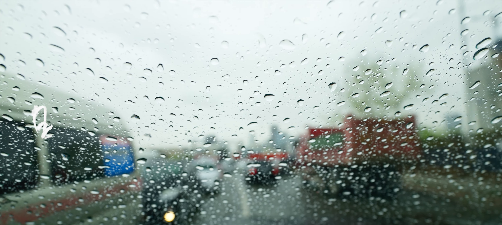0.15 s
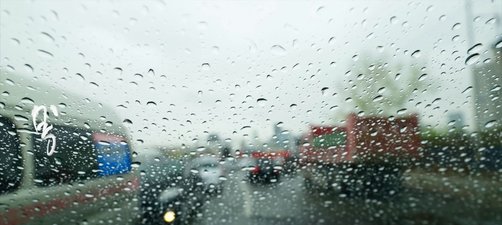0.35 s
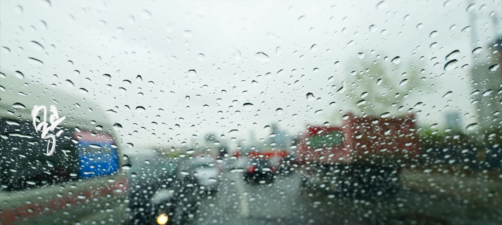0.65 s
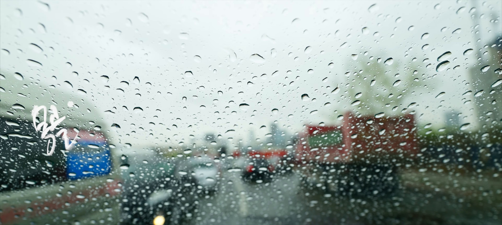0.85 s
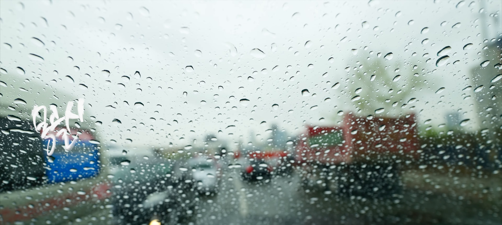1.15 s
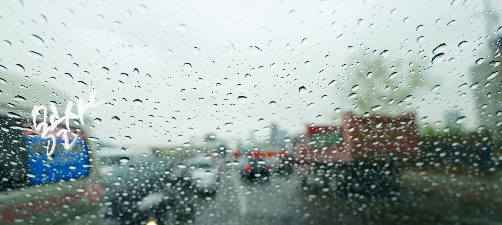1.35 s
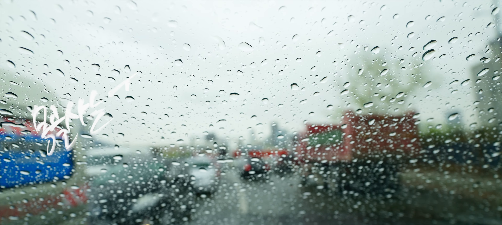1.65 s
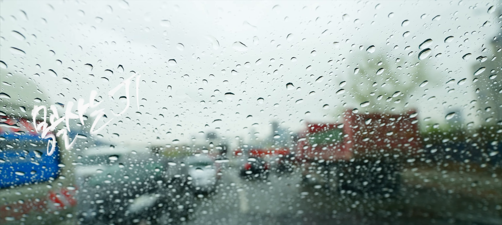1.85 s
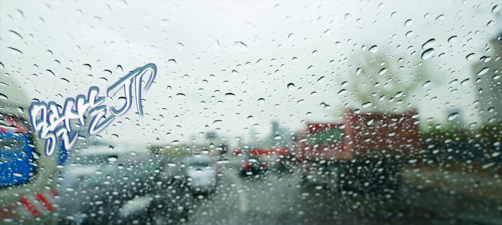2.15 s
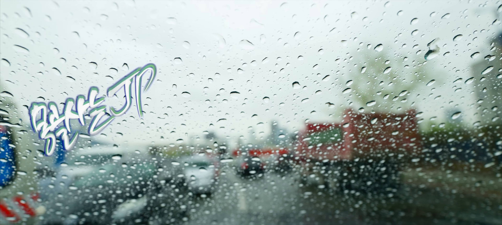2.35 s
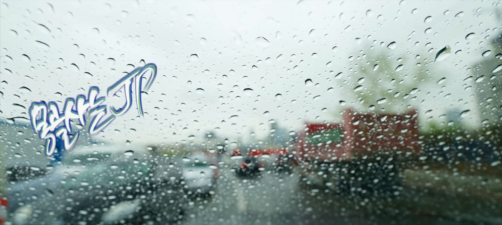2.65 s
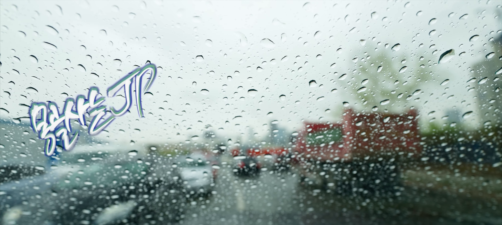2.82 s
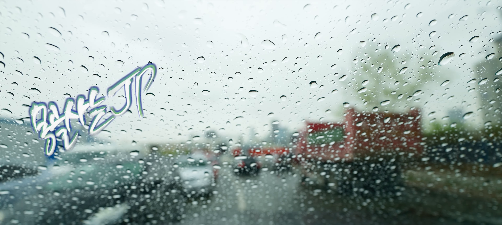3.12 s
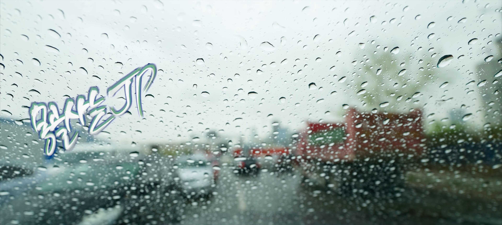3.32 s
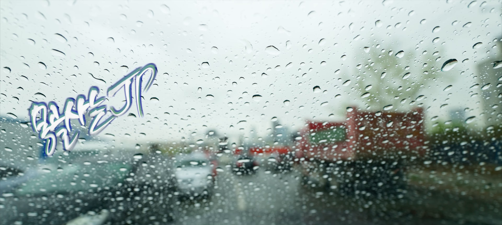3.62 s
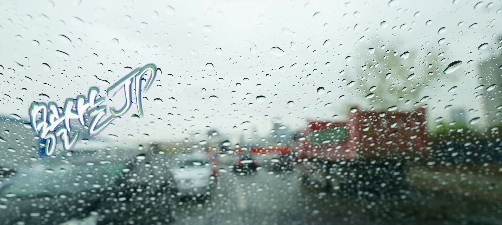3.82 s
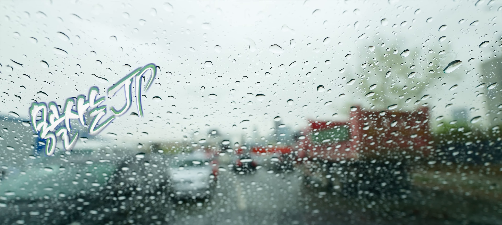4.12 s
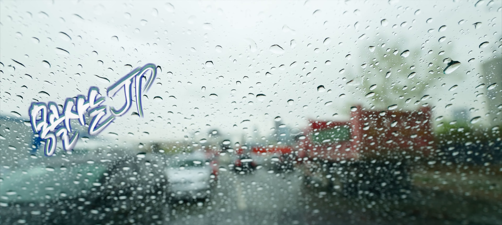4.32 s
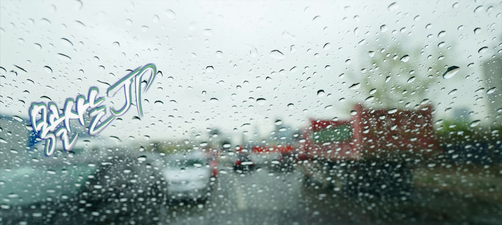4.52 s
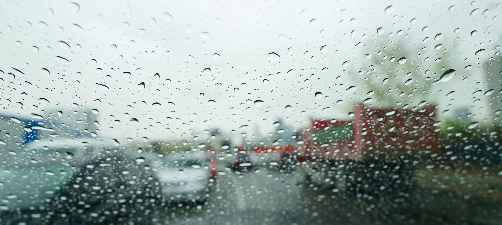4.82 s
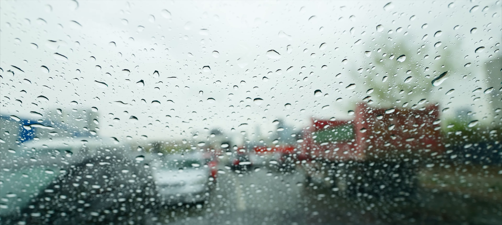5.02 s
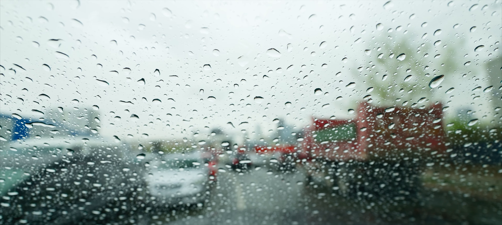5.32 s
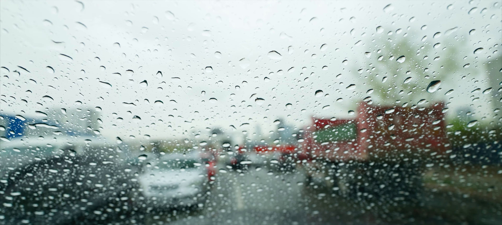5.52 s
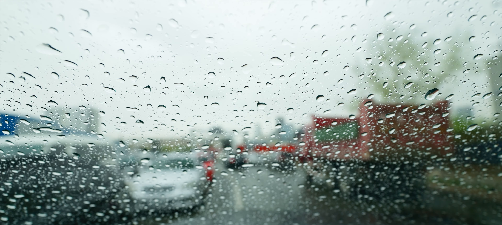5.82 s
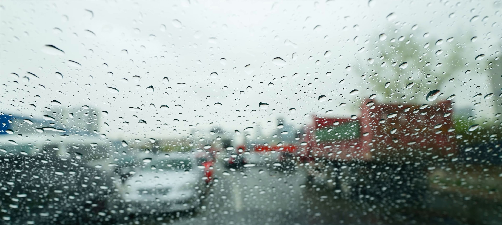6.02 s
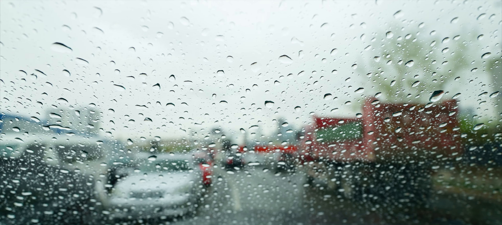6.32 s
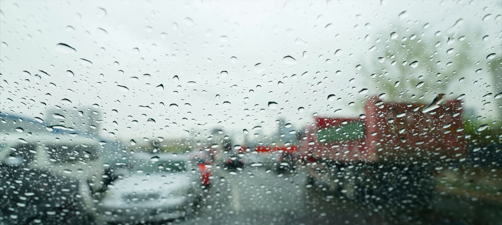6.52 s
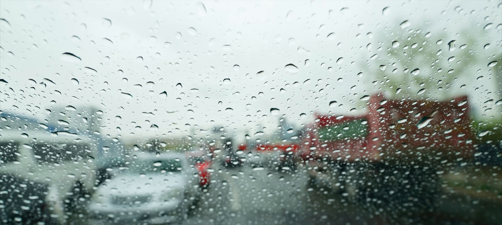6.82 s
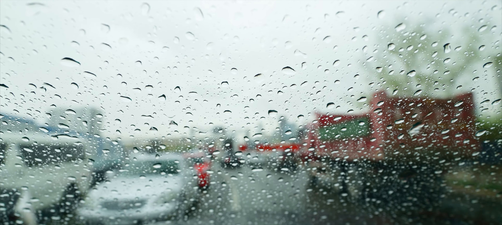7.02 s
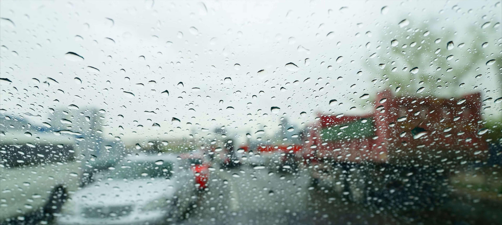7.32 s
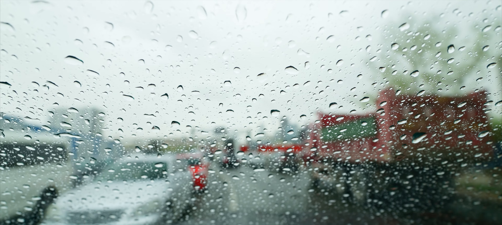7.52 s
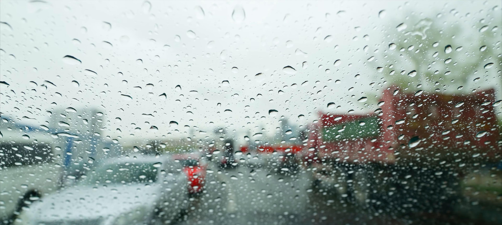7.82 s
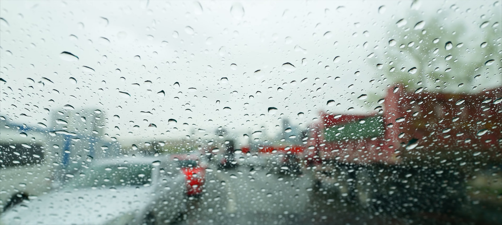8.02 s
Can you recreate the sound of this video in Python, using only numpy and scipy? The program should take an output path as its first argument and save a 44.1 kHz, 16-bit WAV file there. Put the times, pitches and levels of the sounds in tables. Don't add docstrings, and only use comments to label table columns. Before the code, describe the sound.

Inside a car in slow traffic, raindrops patter and snap ever harder as one deep engine climbs, then a louder one accelerates with clatter.

```python
import sys
import numpy as np
from scipy import signal
from scipy.fft import rfft, irfft, next_fast_len
from scipy.io import wavfile
from scipy.ndimage import uniform_filter1d

SR = 44100
rng = np.random.default_rng(int(sys.argv[2]) if len(sys.argv) > 2 else 0)


def bounce(signal):
    frames = np.transpose(np.atleast_2d(signal))
    limited = np.clip(frames, -1, 1)
    pcm = np.round(limited * 32767).astype(np.int16)
    wavfile.write(sys.argv[1], SR, pcm)


def ratio_of_db(decibels):
    return 10 ** (np.asarray(decibels, float) / 20)


N = 359876

# (time [s], level [dB])
SHOWER = [(0.0, -44.5), (0.45, -45), (0.7, -43.5), (1.32, -43.5), (1.93, -42), (2.93, -40.5), (3.29, -38),
          (3.43, -39.5), (3.64, -37), (4.02, -40), (4.73, -39.5), (5.25, -39.5), (5.66, -37), (5.79, -38.5),
          (6.07, -38), (6.2, -37.5), (7.48, -35.5), (8.16, -41)]
# (time [s], peak [dB])
BIG_DROPS = [(0.5238, -25), (0.9847, -25), (1.5207, -23), (3.058, -20), (3.3328, -18), (3.3792, -21),
             (3.4835, -18.5), (3.5737, -35), (3.684, -24), (3.8521, -19), (4.1843, -26), (4.5818, -28),
             (4.7521, -29), (4.8897, -17.5), (4.9935, -19), (5.061, -28), (5.1297, -18.5), (5.3028, -27),
             (5.58, -25), (5.696, -20.5), (5.773, -16.5), (5.9616, -20.5), (6.0741, -17.5), (6.1444, -28),
             (6.203, -23), (6.2645, -18), (6.5001, -16.5), (6.6429, -29), (7.5178, -20), (7.879, -20.5)]
# (frequency [Hz], level per Hz [dB])
PANEL_COLOUR = [(250, 0), (420, -1.5), (600, -5.5), (1000, -5.5), (1700, -7.5), (2250, -13), (3100, -12.5),
                (3600, -16), (5600, -23.5), (6600, -31), (7800, -44), (9100, -41), (10200, -45),
                (15500, -58)]
# (frequency [Hz], 60 dB decay [s])
PANEL_DECAY = [(300, 0.075), (1500, 0.12), (4000, 0.03), (8000, 0.03), (15000, .012)]
# (frequency [Hz], width [Hz], level [dB])
CABIN_MODES = [(467, 68, -16), (1000, 72, -21), (1433, 100, -16), (2630, 1300, -16), (7120, 170, -9.5),
               (8640, 570, -19)]
# (time [s], peak [dB])
GLASS_TICKS = [(0.4294, -48), (2.366, -45), (3.0574, -41), (3.1906, -51), (3.2056, -40.5), (3.5259, -41.5),
               (3.7988, -44), (4.3814, -46), (4.9227, -47), (5.0095, -48), (5.3028, -52), (5.5099, -39.5),
               (5.6156, -47), (5.696, -42), (5.9589, -40.5), (6.1729, -49), (6.2108, -39.5), (6.3345, -41),
               (6.6588, -50), (6.7436, -48), (6.9641, -48), (7.0414, -44), (7.0993, -47), (7.3572, -47.5),
               (7.5168, -46), (7.5393, -39), (7.5642, -41), (7.8406, -45), (7.8635, -46), (8.1419, -47)]
# (time [s], peak [dB])
SIDE_WINDOW_TAPS = [(1.2271, -30), (1.52, -29.5), (2.4808, -28), (2.557, -30), (2.6559, -27), (3.0924, -25),
                    (3.3328, -30), (3.484, -34), (3.5733, -40), (3.7633, -28.5), (3.8511, -23), (4.0996, -34),
                    (4.682, -26), (5.0614, -27), (5.1637, -34), (5.231, -33), (5.3028, -26), (5.773, -31),
                    (5.8506, -22.5), (6.0726, -33), (6.121, -21), (6.4003, -29), (6.965, -26.5), (7.0898, -25),
                    (7.4854, -29), (7.5178, -28), (7.5392, -27.5), (8.0511, -32.5), (8.086, -39), (8.112, -27.5)]
# (time [s], firing rate [Hz])
FIRST_SPEED = [
    (0, 38.91),
    (0.951, 39.73),
    (1.299, 48.54),
    (2.2, 54),
    (2.651, 58.7),
    (3.089, 62.43),
    (3.9, 67.17),
    (4.4, 70.4),
    (4.6, 65.36),
]
# (time [s], effort [dB])
FIRST_THROTTLE = [
    (0.2, -9),
    (0.9, -18),
    (1.1, 0.5),
    (1.6, -10.5),
    (2.3, -2.5),
    (2.65, 0.5),
    (3.55, -0.5),
    (3.7, -4.5),
    (4.45, 0),
]
# (multiple of firing rate, level [dB], share of effort followed)
FIRST_ORDERS = [(1, -22.5, 1.3), (2, -32, 1.05), (3, -38, 0.43)]
# (time [s], effort [dB])
IDLE_EFFORT = [
    (2.8, -8),
    (3.28, -3),
    (3.52, -12),
    (3.68, -7),
    (4.2, -11),
    (4.47, 1),
    (4.78, -6),
    (5.27, 5),
    (5.46, -13),
]
# (multiple of firing rate, level [dB], share of effort followed)
IDLE_ORDERS = [(0.98, -18, 1), (5 / 2, -33, 0.19)]
# (time [s], firing rate [Hz])
SECOND_SPEED = [
    (5.6, 44.5),
    (6.1, 47.9),
    (6.322, 51.73),
    (6.55, 55.4),
    (7.03, 68.45),
    (7.55, 78.42),
    (7.75, 81.38),
    (7.97, 82.15),
    (8.16, 82),
]
# (time [s], effort [dB])
SECOND_THROTTLE = [
    (5.6, -18),
    (5.75, -14.5),
    (6.08, -3.5),
    (6.2, -16),
    (6.28, -1),
    (6.9, -2),
    (7.3, -1),
    (7.76, 2.5),
    (7.92, -15.5),
]
# (multiple of firing rate, level [dB], share of effort followed)
SECOND_ORDERS = [(1, -12, 0.42), (3 / 2, -21, 0.18), (2, -15.5, 0.82), (5 / 2, -35.5, -0.33)]
# (frequency [Hz], width [Hz], level [dB])
BODY_MODES = [(271.7, 22, 2), (302.4, 8.9, -4.5), (344.8, 17.5, -4.5), (378.4, 11, -11.5), (463, 42, -9.5),
              (884, 180, -10.5), (1437, 74, -13)]
# (frequency [Hz], level [dB])
CABIN_BOOM = [(42, -4.5), (52, 0.5), (63, -4.5), (90, -13.5), (104, -1), (123, 4.5), (160, -1),
              (185, -23.5)]
# (time [s], level [dB])
TRAFFIC = [(0.0, -49), (1.48, -43.5), (2.57, -39), (2.98, -38), (3.57, -37.5), (3.73, -36.5), (4.0, -35.5),
           (5.2, -40), (5.55, -41.5), (5.82, -38.5), (6.27, -34.5), (6.5, -37.5), (7.79, -30), (8.16, -31)]
# (frequency [Hz], level per Hz [dB])
RUMBLE_COLOUR = [(15, -3.5), (25, -15.5), (45, 7), (65, -8), (88, -1.5), (120, 2), (150, -1.5), (200, -9),
                 (270, -12.5), (400, -22), (600, -27)]
# (start [s], length [s], frequency [Hz], level [dB])
FAR_HUM = [
    (0.0, 0.67, 124, -45),
    (0.2, 0.7, 150, -43),
    (3.5, 0.5, 122, -28.5),
    (0.5, 0.89, 72, -36.5),
    (3.5, 1.5, 68, -32),
]
# (start [s], length [s], level [dB])
SPLASHES = [
    (.55, 0.58, -68),
    (2.35, 0.25, -64),
    (2.995, 1.0, -64),
    (4.7, 0.62, -63.5),
    (5.4, .9, -64),
    (6.8, 0.6, -69),
]
# (time [s], level [dB], frequency [Hz], 60 dB decay [s])
THUD = (5.422, -15, 200, .05)

PATTER_DB, PATTER_FOLLOWS, SPRAY_FOLLOWS = -35, 0.56, 1
TREBLE_DB, TREBLE_FOLLOWS = -16, 0.46
DEEP_DB, DEEP_FOLLOWS = -41, 0.3
DRONE_DB, DRONE_FOLLOWS = -38.5, 0.86
UPPER_DB, UPPER_FOLLOWS = -37, 0.77
CLATTER_DB, CLATTER_DB_PER_OCTAVE, CLATTER_FOLLOWS = -33.5, 12, 0.28
IDLE_HZ, PULL_ENDS_S = 43.8, 7.97
STUMBLE_S, STUMBLE_WIDTH_S, STUMBLE_DB = 7.065, 0.035, -16
HUM_WIDTH_HZ = 8.7
HISS_DB = -66


def rms_one(x):
    return x / np.sqrt(np.mean(x ** 2) + 1e-20)


def seconds():
    return np.arange(N) / SR


def in_time(rows):
    s, values = np.transpose(rows)
    return np.interp(seconds(), s, values)


def swing_db(rows):
    level_db = in_time(rows)
    return level_db - level_db.mean()


def at_hz(points, hz):
    table_hz, db = np.transpose(points)
    return np.interp(np.log(hz), np.log(table_hz), db)


def band(x, low_hz, high_hz):
    return signal.sosfilt(signal.butter(2, [low_hz, high_hz], "band", fs=SR, output="sos"), x)


def resonance(x, hz, width_hz):
    r = np.exp(-np.pi * width_hz / SR)
    feedback = [1, -2 * r * np.cos(2 * np.pi * hz / SR), r * r]
    return signal.lfilter(np.array([1, 0, -1]) * (1 - r * r) / 2, feedback, x)


def drift(rate_hz):
    r = np.exp(-80 * np.pi * rate_hz / SR)
    settled = signal.lfilter([1], [1, -2 * r, r * r], rng.standard_normal(N // 40 + 2002))[2000:]
    return np.interp(np.arange(N) / 40, np.arange(len(settled)), rms_one(settled))


def swell(s, length):
    return np.sqrt(np.sin(np.pi * np.clip((seconds() - s) / length, 0, 1)).clip(0))


def blows(rows, gain_db):
    s, peak_db = np.transpose(rows)
    out = np.zeros(N)
    out[np.round(s * SR).astype(int)] = ratio_of_db(peak_db + gain_db)
    return out


def shower(per_s, size_db, gust_db):
    sizes = ratio_of_db(size_db * np.minimum(rng.exponential(1, N), 3.5)) * rng.choice([-1, 1], N)
    falls = rng.random(N) < per_s * ratio_of_db(gust_db * drift(30)) / SR
    return rms_one(sizes * falls)


def panel_answers(count, click_db):
    t = np.arange(6000) / SR
    edges = 280 * 2 ** np.arange(0, 6, 1 / 5)
    rattle = rng.standard_normal((2, count, len(t)))
    spot_db = 1.8 * rng.standard_normal((len(edges), count, 1))
    hard_db = 1.6 * np.linspace(-1, 1, count)[:, None]
    out = 0
    for k, (low, high) in enumerate(zip(edges, edges[1:])):
        hz = np.sqrt(low * high)
        dying = rattle[k % 2] * ratio_of_db(-60 * t / at_hz(PANEL_DECAY, hz))
        dying[:, 0] += ratio_of_db(click_db) * (-1) ** k
        narrow = band(band(dying, low, high), low / 1.183, high * 1.097)
        colour_db = at_hz(PANEL_COLOUR, hz) + spot_db[k] + hard_db * max(np.log2(hz / 3000), 0)
        out = out + rms_one(narrow) * np.sqrt(high - low) * ratio_of_db(colour_db)
    return out / np.sqrt(np.mean(np.sum(out ** 2, axis=1)))


def strike(hits, answers):
    dealt = rng.integers(0, len(answers), N)
    size = next_fast_len(N + answers.shape[1])
    total = sum(rfft(hits * (dealt == k), size) * rfft(a, size) for k, a in enumerate(answers))
    return irfft(total, size)[:N]


def patter_level_db():
    return PATTER_DB + PATTER_FOLLOWS * swing_db(SHOWER)


def road_wash():
    level_db = PATTER_DB + SPRAY_FOLLOWS * swing_db(SHOWER) + 0.8
    return ratio_of_db(level_db) * band(rng.standard_normal(N), 200, 3260)


def rain_on_panels():
    patter_db = patter_level_db()
    hits = ratio_of_db(patter_db - 1.6) * shower(per_s=1800, size_db=6.0, gust_db=1.0)
    hits += ratio_of_db(patter_db - 14) * shower(per_s=22, size_db=2.5, gust_db=-2.3)
    hits += blows(BIG_DROPS, gain_db=12.5)
    drops = strike(hits + road_wash(), panel_answers(count=20, click_db=17.5))
    bright_db = TREBLE_DB + TREBLE_FOLLOWS * swing_db(SHOWER)
    drops += (ratio_of_db(bright_db + 17.0) - 1) * band(drops, 2700, 15000)
    return drops + sum(ratio_of_db(db + 13.0) * resonance(drops, hz, width) for hz, width, db in CABIN_MODES)


def glass_ticks():
    ticks = np.roll(blows(GLASS_TICKS, gain_db=11), 40)
    ticks += ratio_of_db(patter_level_db() - 37.5) * shower(per_s=180, size_db=8.0, gust_db=4.5)
    return band(ticks, 6000, 16000) + ratio_of_db(8.0) * band(ticks, 5500, 9800)


def side_window_taps():
    taps = np.roll(blows(SIDE_WINDOW_TAPS, gain_db=10), 20)
    return ratio_of_db(2.0) * band(band(taps, 3500, 7500), 3000, 7600)


def engine(firing_hz, effort_db, heard_s, orders, rough_db):
    phase = 2 * np.pi * np.cumsum(firing_hz) / SR
    start_s, end_s = heard_s
    fade_in = np.clip((seconds() - start_s) / 0.1 + 1, 0, 1)
    fade_out = np.clip((end_s - seconds()) / 0.1 + 1, 0, 1)
    tones = 0
    for k, db, share in orders:
        level_db = db + share * effort_db + at_hz(CABIN_BOOM, k * firing_hz) + rough_db * drift(5)
        tones = tones + ratio_of_db(level_db) * np.sin(k * phase + 0.12 * drift(4))
    return np.sqrt(2) * fade_in * fade_out * tones


def first_engine():
    heard_s = (FIRST_SPEED[0][0], FIRST_SPEED[-1][0])
    return engine(in_time(FIRST_SPEED), in_time(FIRST_THROTTLE), heard_s, FIRST_ORDERS, rough_db=3.5)


def traffic(patchy_db):
    near_db = swing_db(TRAFFIC)
    edges = 14 * 2 ** np.arange(0, 5.7, 1 / 3)
    white = rng.standard_normal((2, N + SR))
    out = 0
    for k, (low, high) in enumerate(zip(edges, edges[1:])):
        hz = np.sqrt(low * high)
        if hz < 38:
            level_db, anchor_hz = DEEP_DB + DEEP_FOLLOWS * near_db, 25
        elif hz < 170:
            level_db, anchor_hz = DRONE_DB + (hz > 62) * DRONE_FOLLOWS * near_db, 65
        else:
            level_db, anchor_hz = UPPER_DB + UPPER_FOLLOWS * near_db, 270
        colour_db = at_hz(RUMBLE_COLOUR, hz) - at_hz(RUMBLE_COLOUR, anchor_hz)
        noise = rms_one(band(white[k % 2], low, high)[SR:])
        out = out + noise * ratio_of_db(level_db - 3.5 + colour_db + patchy_db * drift(2.25))
    return out


def far_hum():
    out = 0
    for s, length, hz, db in FAR_HUM:
        noise = resonance(resonance(rng.standard_normal(N), hz, HUM_WIDTH_HZ), hz, HUM_WIDTH_HZ)
        out = out + ratio_of_db(db) * swell(s, length) * rms_one(noise)
    return out


def splashes():
    level = sum(ratio_of_db(db) * swell(s, length) for s, length, db in SPLASHES)
    grains = shower(per_s=2500, size_db=5.0, gust_db=2.5)
    return level * rms_one(band(band(grains, 5500, 10000), 4500, 11500))


def idling_engine():
    heard_s = (IDLE_EFFORT[0][0], SECOND_SPEED[0][0] - 0.12)
    return engine(np.full(N, IDLE_HZ), in_time(IDLE_EFFORT), heard_s, IDLE_ORDERS, rough_db=3.5)


def thud():
    s, db, hz, t60 = THUD
    t = np.maximum(seconds() - s, 0)
    ring = np.sin(2 * np.pi * hz * t) + 0.5 * np.sin(4 * np.pi * hz * t)
    return ratio_of_db(db - 60 * np.minimum(t, 1) / t60) * ring


def second_effort_db():
    stumble = np.exp(-((seconds() - STUMBLE_S) / STUMBLE_WIDTH_S) ** 2)
    return in_time(SECOND_THROTTLE) + STUMBLE_DB * stumble


def second_engine():
    heard_s = (SECOND_SPEED[0][0], PULL_ENDS_S)
    return engine(in_time(SECOND_SPEED), second_effort_db(), heard_s, SECOND_ORDERS, rough_db=0.64)


def clatter(depth):
    firing_hz = in_time(SECOND_SPEED)
    level_db = CLATTER_DB + CLATTER_DB_PER_OCTAVE * np.log2(firing_hz / 50) + CLATTER_FOLLOWS * second_effort_db()
    engaged = np.clip((seconds() - 5.8) / 0.3, 0, 1)
    pulses = 1 + depth * np.cos(2 * np.pi * np.cumsum(firing_hz) / SR)
    shake = pulses * rng.standard_normal(N)
    body = sum(ratio_of_db(db) * rms_one(resonance(resonance(shake, hz, w), hz, w)) for hz, w, db in BODY_MODES)
    return engaged * ratio_of_db(level_db - 3.0) * body


def scene():
    rain = rain_on_panels() + glass_ticks() + side_window_taps()
    engines = first_engine() + idling_engine() + second_engine() + clatter(depth=0.78)
    road = traffic(patchy_db=1.85) + far_hum() + splashes()
    return (rain + engines + road + thud())[None]


def band_limit(x):
    return signal.sosfilt(signal.butter(12, 15800, fs=SR, output="sos"), x)


def record(dry):
    loud_db = 10 * np.log10(uniform_filter1d(dry ** 2, size=SR // 3, axis=1) + 1e-9)
    hiss_db = HISS_DB - 0.3 * np.maximum(loud_db + 19, 0)
    x = dry + ratio_of_db(hiss_db) * rng.standard_normal(dry.shape)
    x *= np.clip((N - np.arange(N)) / (0.006 * SR), 0, 1)
    rounded = 0.95 * np.tanh(x / 0.91)
    top_edge = signal.ellip(10, 0.2, 60, 15850, fs=SR, output="sos")
    mix = signal.sosfilt(top_edge, rounded)
    return band_limit(mix)


dry = scene()
out = record(dry)
bounce(out)
```